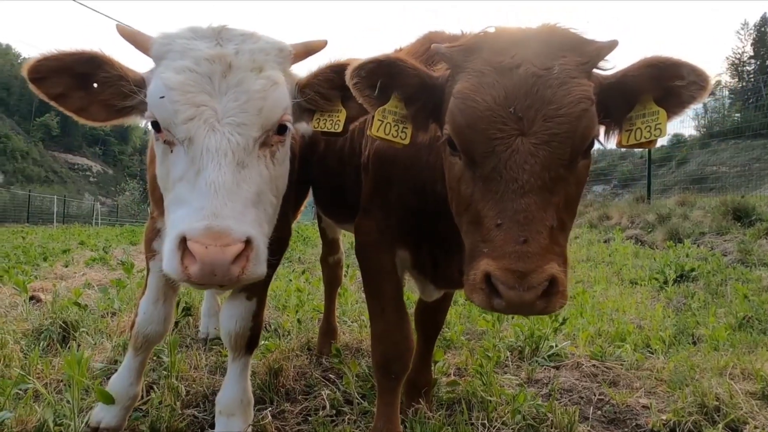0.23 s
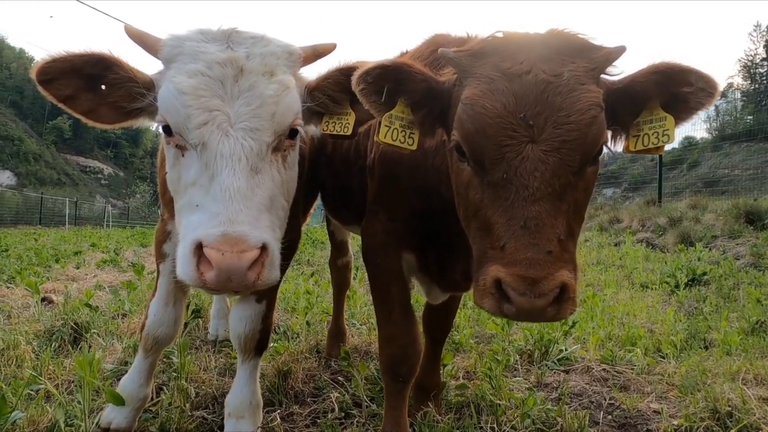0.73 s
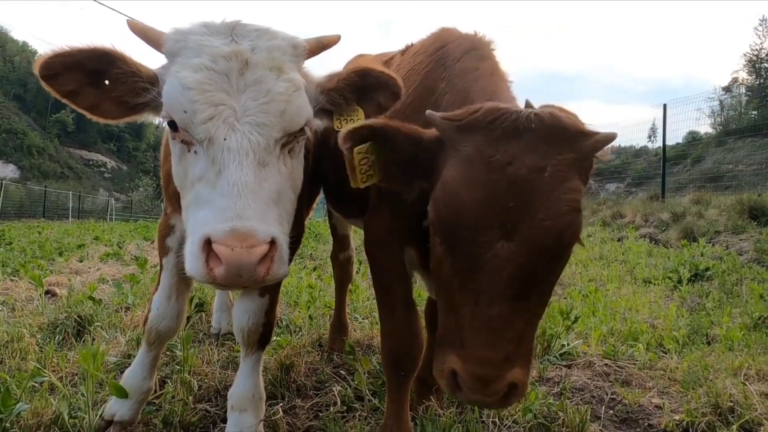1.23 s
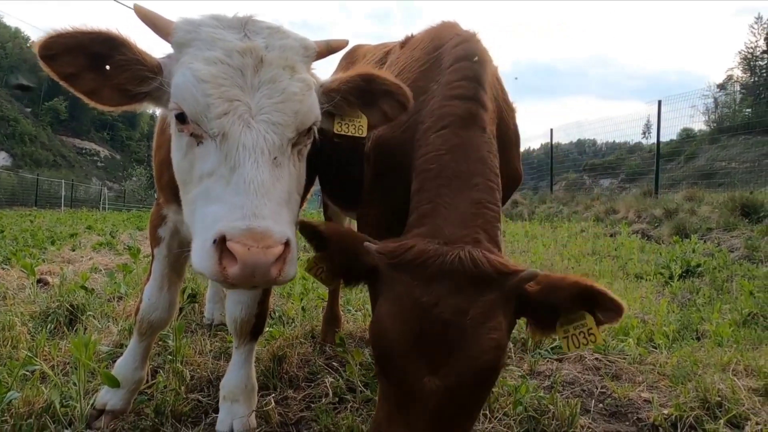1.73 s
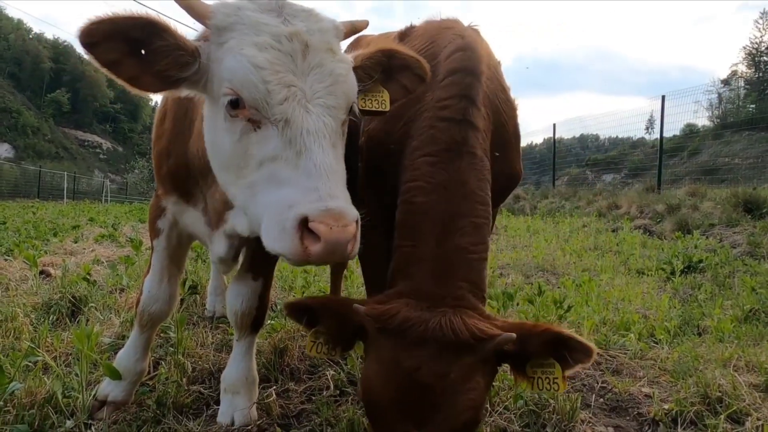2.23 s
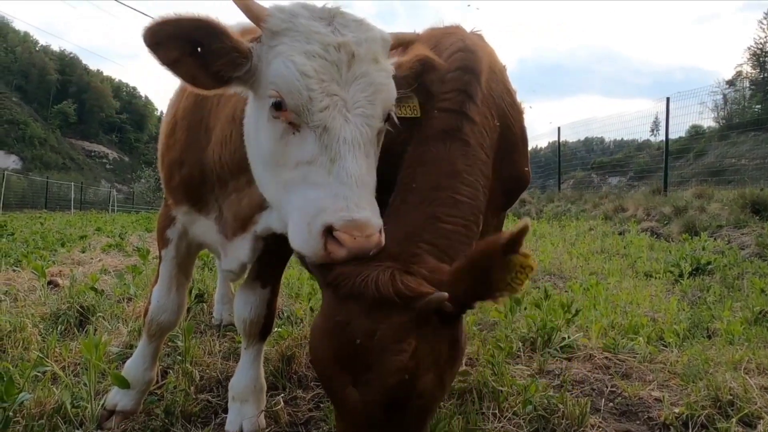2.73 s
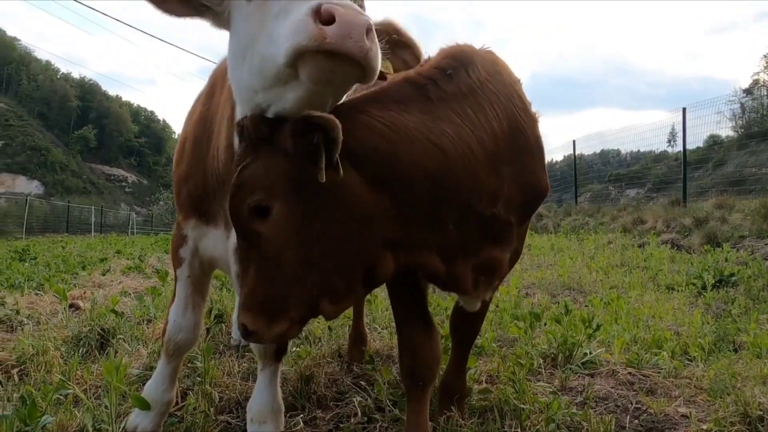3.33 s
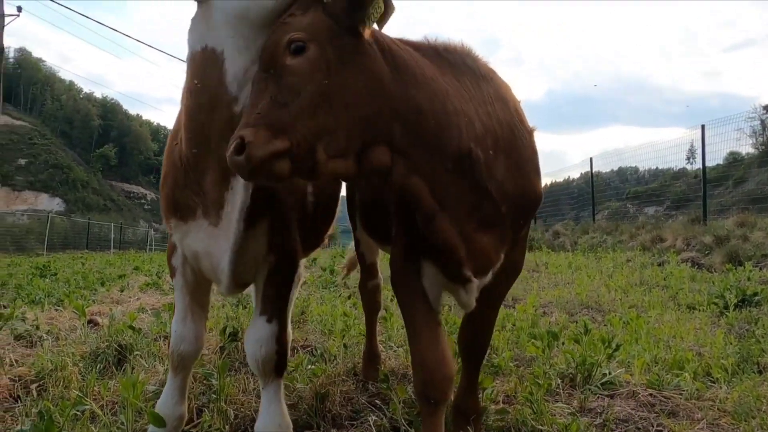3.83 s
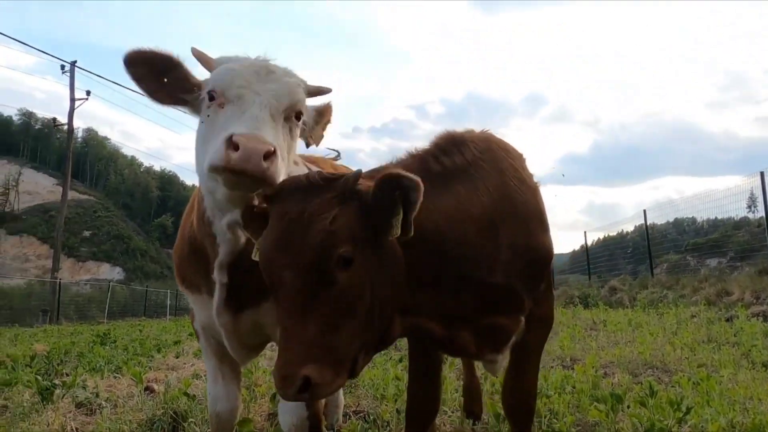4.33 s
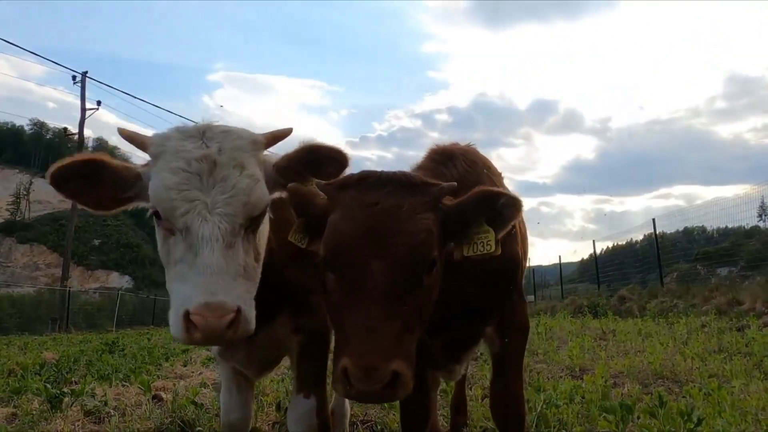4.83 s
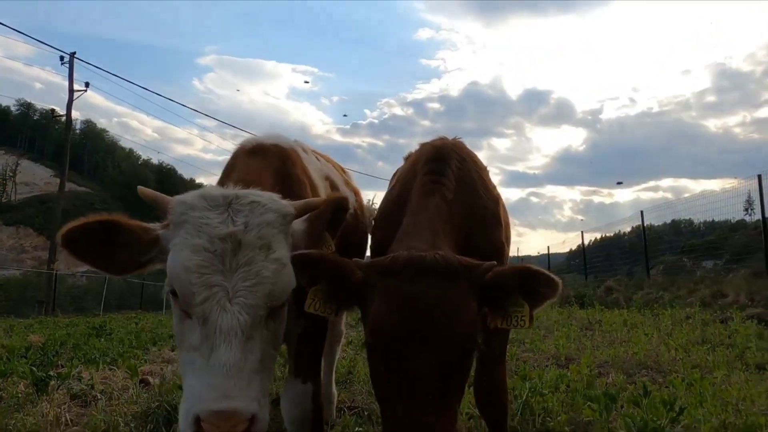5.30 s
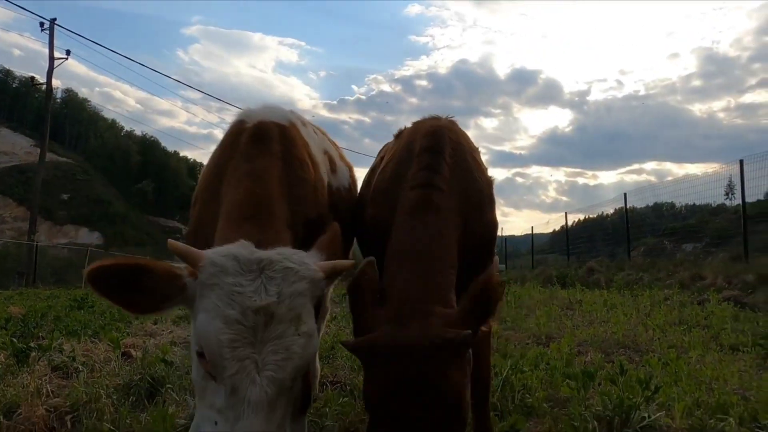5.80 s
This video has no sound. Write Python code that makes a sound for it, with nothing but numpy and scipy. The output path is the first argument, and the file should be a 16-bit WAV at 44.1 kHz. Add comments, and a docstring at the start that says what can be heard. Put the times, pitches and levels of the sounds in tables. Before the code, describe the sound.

Two young cattle call close by in a pasture: a hoarse growling moo, snorts, then a hummed moo rising and cracking into a rasping bellow.

```python
"""Calls of cattle, two of them, close by in a pasture: trains of fold pulses filtered by nose, throat and mouth.
The first is a hoarse growl with a climbing tone that locks into a pitch and breaks off; snorts and rustling follow.
After a silence the second starts as a closed-mouth hum, opens into a bright rising moo and cracks into
a rasping bellow. Snorts, hiss, rustling and open air are shaped noise."""
import sys
import numpy as np
from scipy import signal
from scipy.fft import rfft, irfft
from scipy.io import wavfile
from scipy.ndimage import uniform_filter1d, map_coordinates

SR = 44100
rng = np.random.default_rng(int(sys.argv[2]) if len(sys.argv) > 2 else 0)


def materialize(psi):
    """Save the field psi as 16-bit PCM at rate SR to the path in sys.argv[1].

    A 1-D psi becomes a single channel; in a 2-D psi each row is a channel.
    """
    bounded = np.clip(np.atleast_2d(psi).T, -1, 1)
    quanta = np.round(bounded * 32767).astype(np.int16)
    wavfile.write(sys.argv[1], SR, quanta)


N = 267246
TIME = np.arange(N) / SR
SPLIT_HZ, CUTOFF_HZ = 700, 15900   # chest / bright split; top of the recorded band

# Notes that scoop up to pitch and droop as breath runs out. Columns: start in seconds, end in seconds,
# top pitch in Hz, scoop in Hz, scoop time in seconds, droop in Hz, droop time in seconds.
GROWL_NOTE = (.53, 1.46, 310, 150, .3, 160, .045)
LOCKED_NOTE = (.93, 1.45, 101.5, 10.2, .2, 11, .095)
HUM_NOTE = (2.6, 3.61, 106.8, 19, .23, 7.5, .11)
LIFT_NOTE = (3.67, 3.866, 129, 34, .05, 0, .05)
MOO_NOTE = (3.862, 5.0, 150.3, 20.4, .57, 31, .048)
BELLOW_NOTE = (4.78, 5.795, 308, 70, .19, 60, .014)

# Voice levels below (chest) and above (bright) the split. Columns: full from in seconds, until in seconds,
# level in dB, swell in dB per second, attack in seconds, release in seconds.
CLIMB_CHEST = (0, .93, -60, 46, .05, .025)
LOCKED_CHEST = (.95, 1.415, -16.5, -1.5, .04, .02)
LOCKED_BRIGHT = (.98, 1.34, -30.5, 5, .07, .035)
SQUEAK_CHEST = (3.72, 3.76, -39.5, 0, .21, .025)
SQUEAK_BRIGHT = (3.6, 3.84, -49.5, 16, .16, .02)
BELLOW_CHEST = (4.92, 5.805, -25.5, 0, .2, .03)
BELLOW_BRIGHT = (4.95, 5.82, -29, -4, .15, .03)

# Short swells and dips in the level of the voice, some like the beating of close partials.
# Each row: time in seconds, half length in seconds, level change in dB.
BUMPS = [(.812, .022, 6), (.98, .03, 5), (1.04, .035, 4), (1.09, .018, 4.5), (1.135, .012, -5),
         (1.175, .025, 3), (1.203, .008, -8), (1.22, .012, 2), (1.24, .01, -6), (1.29, .04, -2),
         (1.385, .03, 7), (5.02, .08, 3), (5.762, .012, -6), (5.785, .01, 8)]

# A closed-mouth note is louder the higher it gets. Columns: chest level at the top pitch in dB,
# chest slope in dB per Hz, bright level at the top pitch in dB, bright slope in dB per Hz.
HUM_EFFORT = (-35, 1.3, -47, .45)
LIFT_EFFORT = (-41, .35, -44.5, .4)

# Fold vibrations: slackening at the end of each call, closed-mouth grumble, undertone of the moo, and the
# clearer tone in the bellow. Each row: time in seconds, pulse rate in Hz, chest level in dB, bright level in dB.
SLACKEN = [(1.39, 205, -37, -56), (1.42, 180, -21.5, -39.5), (1.46, 145, -33, -44), (1.51, 160, -33, -55),
           (1.57, 150, -51, -75)]
LAST_SLACKEN = [(5.77, 130, -50, -70), (5.79, 150, -40, -55), (5.82, 85, -43, -56), (5.87, 68, -44, -59),
                (5.94, 70, -66, -78)]
GRUMBLE = [(0, 149, -39.5, -52), (0.121, 151, -40, -53.5), (0.269, 168, -33.5, -45),
           (0.399, 159, -36.5, -42), (.5, 165, -32, -44), (0.559, 176, -33, -49)]
UNDERTONE = [(3.949, 61.8, -66, -70), (4.148, 76.1, -44, -56), (4.401, 92.4, -44, -57),
             (4.64, 111.6, -41.5, -54), (4.679, 114.8, -27.5, -34), (4.801, 118.5, -29, -34),
             (4.918, 133.4, -36, -31.5), (5.031, 94.1, -34, -39), (5.08, 84.6, -50, -65)]
BELLOW_TONE = [(4.82, 285, -45, -65), (4.9, 293, -24, -45), (5.02, 287, -24, -42), (5.08, 295, -25, -44),
               (5.11, 325, -35, -52), (5.15, 338, -28, -48), (5.26, 338, -30, -50), (5.29, 403, -34, -42),
               (5.34, 408, -33, -36), (5.37, 338, -29, -48), (5.65, 338, -28.5, -48), (5.74, 338, -29, -50),
               (5.78, 320, -45, -65)]

# Effort and mouth opening: the growl gives way while the folds hold a pitch, returns as they lose it.
# Each row: time in seconds, chest level in dB, bright level in dB.
GROWL_LEVELS = [(.495, -42, -47), (.54, -25.5, -32), (.77, -22.5, -30), (.82, -25, -27.5),
                (.94, -26.5, -27.5), (1.0, -31, -33.5), (1.3, -31.5, -33.5), (1.36, -29, -30),
                (1.42, -27, -30), (1.47, -38, -41), (1.58, -52, -60)]
MOO_LEVELS = [(3.862, -37, -29), (3.884, -37, -26), (3.938, -25, -24), (4.152, -18, -29), (4.342, -19, -22),
              (4.64, -24, -26), (4.846, -25, -25), (4.932, -19, -24), (5.0, -25, -27)]

# Overall spectral slopes of voices and noises. Each row: frequency in Hz, relative level in dB.
CLIMB_SLOPE = [(45, -27), (75, -13.5), (110, 3), (140, -9.5), (170, 1), (200, -14), (240, 3), (272, 5.5),
               (335, -9), (460, -3), (600, -14), (1050, -8), (1350, -9.5), (1750, -21), (3000, -31),
               (5000, -46), (15000, -64.5)]
LOCKED_SLOPE = [(90, -58), (200, -29), (290, 4), (390, -17), (490, -14), (590, -7), (700, -24), (860, -20),
                (1080, -20), (1290, -14.5), (1550, -22), (1900, -21), (2200, -33), (2800, -29), (3700, -46),
                (4500, -40), (5500, -56.5), (15000, -63.5)]
SLACKEN_SLOPE = [(80, -26), (150, 0), (190, -4), (290, 1.5), (450, -24), (1400, -7), (5000, -46),
                 (15000, -65)]
GRUMBLE_SLOPE = [(29, -40), (50, 1), (96, 8), (175, -1), (238, -16.5), (306, -3.5), (458, -5.5), (649, -22),
                 (742, -10), (935, -17), (1700, -16), (2400, -22.5), (2800, -27), (5000, -52), (6500, -73),
                 (11000, -120)]
GROWL_SLOPE = [(40, -26), (110, -16), (170, 0.5), (270, 2.5), (480, -0.5), (750, -10), (1300, -8),
               (1900, -18), (2170, -27), (2450, -20.5), (2900, -20.5), (3800, -43), (4500, -27),
               (5500, -47), (15000, -62)]
HUM_SLOPE = [(50, -6), (95, 5), (210, 4.5), (310, -16.5), (530, -13), (740, -25), (1200, -22.5),
             (1600, -30.5), (1950, -35), (2250, -30.5), (2900, -31.5), (3500, -38.5), (5300, -55),
             (11000, -52.5), (15000, -59)]
SQUEAK_SLOPE = [(100, -13), (190, 6), (380, 8), (600, -8), (850, -4), (1250, -5), (1700, -17.5),
                (2450, -6.5), (3500, -12.5), (4300, -34), (10000, -35.5), (15000, -34)]
MOO_SLOPE = [(125, -27.5), (280, -14.5), (390, -0.5), (445, 0), (560, -31.5), (700, -17.5), (860, -12),
             (1020, -23), (1300, -15.5), (2000, -22.5), (3300, -28.5), (4000, -40.5), (5300, -49.5),
             (9500, -50), (15000, -55)]
UNDERTONE_SLOPE = [(30, -26), (65, -8), (110, -9), (160, -8), (235, 0), (340, -17.5), (600, -11),
                   (1300, -15), (1900, -26), (3000, -29), (5000, -46), (15000, -74)]
BELLOW_SLOPE = [(50, -34.5), (130, -26), (240, 2.5), (330, -1), (460, -5), (800, -10), (1300, -7),
                (1650, -17.5), (2600, -23.5), (3700, -37.5), (4400, -34), (5500, -42.5), (11000, -44.5),
                (15000, -50)]
SNORT_SLOPE = [(180, -34), (300, -10), (442, 6), (630, -6), (1040, 3), (1150, -3.5), (1860, -6),
               (2220, -16), (5000, -48), (6500, -45), (11000, -120)]
HISS_SLOPE = [(2000, -8), (3200, 3), (5000, -1), (7000, -1), (9000, 3), (11500, 1), (15000, -7.5)]
AIR_SLOPE = [(10, -22), (25, -8), (45, -5.5), (100, -6), (250, -12), (1000, -22.5), (4000, -31),
             (15000, -52)]

# Fixed-shape resonances of nose, mouth and throat. Each row: frequency in Hz, width in Hz, lift in dB.
NOSE = [(425, 100, 8.5), (540, 70, -4), (630, 90, 12), (1080, 90, -8), (1200, 110, 7), (2370, 160, 7),
        (2810, 230, 15), (3840, 86, 7), (4570, 180, 12), (6460, 660, 20), (9120, 180, 16)]
NOSTRILS = [(2460, 230, -20), (2840, 190, 19)]
MOUTH = [(1410, 146, 2.75), (1726.5, 131, 16), (2015, 110, -10), (2180, 120, 4), (2565, 110, 10),
         (2790, 110, -13), (3020, 170, 3.5), (3350, 500, 3), (4080, 250, -7), (4420, 500, 12),
         (5130, 160, -8), (5800, 140, 8), (6950, 400, -9), (7880, 290, 6.5), (8300, 150, -8),
         (8950, 500, 11)]
THROAT = [(275, 70, 2), (920, 64.6, 5.5), (1940, 150, 6.5), (2480, 120, 5)]

# Lips pushing forward shift the resonances of the second call, mostly down.
# Each row: time in seconds, factor on resonance frequency (a ratio).
NOSE_GLIDE = [(2.6, 1.025), (3.0, .995), (3.3, 0.975), (3.5, 0.945), (3.85, 0.84)]
MOUTH_GLIDE = [(3.86, 1.035), (4.05, 0.99), (4.2, .99), (4.45, 0.99), (4.8, 0.962), (5.0, 0.99)]

# Momentary resonances as jaw, tongue and lips move. Each row: time in seconds, half length in seconds,
# frequency in Hz, glide in Hz per second, width in Hz, lift in dB.
GROWL_SHAPES = [(.57, .06, 160, 0, 30, 7), (.58, .06, 3400, 0, 200, 8), (.63, .05, 1510, 0, 80, 8),
                (.64, .05, 470, 0, 50, 6), (.68, .13, 1300, 0, 400, 3), (.84, .06, 450, 0, 110, 7),
                (.85, .06, 2050, 0, 200, 5), (.86, .09, 2650, 0, 500, 4), (.87, .08, 4450, 0, 400, 6),
                (.88, .06, 1140, -800, 110, 6), (.94, .04, 950, 0, 70, 8), (1.37, .04, 930, -5000, 200, 7)]
LOCKED_SHAPES = [(1.03, .07, 950, 0, 70, 8), (1.072, .018, 570, 0, 120, -14), (1.2, .12, 390, 0, 50, 7),
                 (1.2, .1, 1660, 0, 70, 7), (1.2, .12, 1170, 0, 60, 4), (1.27, .06, 585, 0, 70, 4),
                 (1.365, .018, 570, 0, 120, -12), (1.42, .02, 570, 0, 120, -9)]
HUM_SHAPES = [(2.68, .12, 480, 0, 250, 6), (2.68, .12, 2450, 0, 140, -9), (2.92, .06, 2300, -400, 110, 10),
              (3.0, .1, 2590, 0, 90, 8), (3.0, .13, 935, 0, 70, 6), (3.0, .06, 1240, 0, 70, 4),
              (3.27, .2, 520, 0, 50, -10), (3.27, .11, 2315, 200, 90, 8), (3.33, .11, 3790, -300, 100, 9),
              (3.4, .15, 1780, 0, 80, 7), (3.55, .08, 1260, 200, 110, 7)]
MOO_SHAPES = [(3.87, .05, 900, 0, 500, -8), (3.95, .07, 1190, 0, 100, -6), (4.0, .07, 1400, 0, 160, 4),
              (4.0, .06, 2570, 0, 100, 4), (4.02, .07, 2950, 0, 120, 6), (4.13, .035, 1720, 0, 300, -10),
              (4.14, .06, 3300, 0, 700, -5), (4.27, .05, 2360, 0, 200, 6), (4.35, .11, 1845, 100, 60, 9),
              (4.4, .06, 2140, 200, 80, 6), (4.43, .05, 2320, 0, 160, -9), (4.47, .08, 3180, 300, 400, 7),
              (4.58, .1, 4280, 0, 250, 5), (4.65, .12, 1930, 0, 160, -7), (4.76, .13, 2920, 200, 70, 6),
              (4.76, .13, 3660, 0, 200, 8), (4.78, .1, 1610, 0, 90, 7), (4.79, .1, 2490, 0, 80, 5)]
BELLOW_SHAPES = [(4.98, .06, 1750, 0, 300, 7), (5.0, .028, 3800, 0, 1400, 16), (5.07, .05, 590, 0, 90, 5),
                 (5.3, .05, 310, 0, 90, -4), (5.31, .03, 600, 0, 200, -7)]

# Stereo balance. Each row: frequency in Hz, left minus right level in dB.
GROWL_BALANCE = [(60, -5.5), (110, -2), (200, 8), (380, 3), (700, 1.5), (1290, -0.5), (2380, -0.5),
                 (4400, 2), (8120, 0.5), (15000, -2.5)]
LOCKED_BALANCE = [(60, 3.5), (110, 4.0), (200, -2), (380, -4), (700, -3), (1290, 0), (2380, 1.5),
                  (4400, -1.5), (8120, -1), (15000, -1.5)]
HUM_BALANCE = [(60, 10), (110, 9), (200, 11.5), (380, 7), (700, 6.5), (1290, 3.5), (2380, 8), (4400, 5.5),
               (8120, 4), (15000, -2)]
MOO_BALANCE = [(60, -17), (110, -6.5), (200, 6), (380, 6), (700, 1), (1290, 7), (2380, 5), (4400, 8),
               (8120, 5), (15000, -2)]
BELLOW_BALANCE = [(60, 0.5), (110, 2.7), (200, 8.7), (380, 2.6), (700, 0.51), (1290, 1.5), (2380, 0.87),
                  (4400, 1.5), (8120, 1.0), (15000, 1.5)]

# Stereo phase. Each row: frequency in Hz, lead of the left side in radians.
LOCKED_LEAD = [(290, 1.0), (500, 0.94), (800, 0.095), (1400, -0.49), (5000, 0)]
HUM_LEAD = [(110, 0.19), (210, -0.21), (420, 0), (1100, 0.6), (3000, 0)]
MOO_LEAD = [(280, 0.24), (430, 0.38), (850, 0.41), (1700, 0.25), (2400, 1), (5000, 0)]

# Flat curve: no slope, balance or lead. Each row: frequency in Hz, value in dB or radians.
FLAT = [(50, 0), (15000, 0)]

# Breath and wind noises. Each row: full from in seconds, until in seconds, level in dB,
# swell in dB per second, attack in seconds, release in seconds.
NOSE_LEAK = [(2.85, 3.08, -64, 4, .25, .08)]
SNORTS = [(1.64, 1.68, -45, -20, .13, .08), (2.0, 2.09, -54.5, -10, .07, .04)]
CALL_HISS = [(0, 1.42, -57, 5.3, .05, .025)]
GUSTS = [(0, 2.1, -46, -5, .05, .1), (3.7, 5.6, -53, -4, .17, .1), (5.84, 5.88, -53, 0, .05, .06)]

# Hooves and muzzles brush the grass. Each row: time in seconds, level in dB, attack in seconds, release in seconds.
RUSTLES = [(.18, -52, .1, .04), (.328, -46.5, .012, .012), (.36, -50, .012, .015), (.84, -48.5, .04, .03),
           (1.8, -48.5, .035, .018), (2.04, -60, .13, .1)]

# First call's tone: steady climb, sharper with each swell; brightness over chest jumps as the mouth opens.
CLIMB_FROM_HZ, CLIMB_HZ_PER_S, CLIMB_TOP_HZ, CLIMB_HZ_PER_DB = 72, 72, 135, .6
MOUTH_OPENS_S, MOUTH_OPENING_S, CLOSED_BRIGHT_DB, OPEN_BRIGHT_DB = .51, .04, -14, -10
# Growl rattle, before levelling.
RATTLE_POINTS_PER_S, RATTLE_DB = 70, 2.5
# Squeak: slides up as the lips part, then levels off.
SQUEAK_START_S, SQUEAK_FROM_HZ, SQUEAK_HZ_PER_S, SQUEAK_TOP_HZ = 3.49, 118, 360, 196
# Moo: folds snap shut harder as it rises, lifting its top end; it then melts into the bellow.
SNAP_ABOVE_HZ, SNAP_DB, SNAP_DB_PER_HZ = 5000, 5, .5
MOO_BREAK_S = .035
# Bellow: overblown folds flap unevenly; part of each swell or dip reaches the bright formants.
FLAP_HZ, FLAP_SPREAD, FLAP_DEPTH = 56, .3, .12
BELLOW_BUMP_SHARE = .25
GRASS_DB, AIR_DB = -68, -74   # floors between rustles and gusts
# Silence between the calls; 20 dB down after FADE_S.
FADE_FROM_S, FADE_S, RESUME_S = 2.11, .075, 2.598


def first_call():
    """A tone climbs, the folds lock to a lower pitch, then slacken."""
    bump_db = level_bumps()
    slack = folds(in_time(SLACKEN)[0], wobble=.02, jitter_ms=.2, shimmer_db=1.5, air=.25)
    slack = tract(slack, SLACKEN_SLOPE)
    return climbing_tone(bump_db) + locked_tone(bump_db) + voiced_along(slack, SLACKEN)


def climbing_tone(bump_db):
    """Fold pulses, every other one weaker, rise in pitch with time and follow each swell or dip."""
    pitch = np.minimum(CLIMB_FROM_HZ + CLIMB_HZ_PER_S * TIME, CLIMB_TOP_HZ) + CLIMB_HZ_PER_DB * bump_db
    chest_db = held(*CLIMB_CHEST) + bump_db
    opening_s = [MOUTH_OPENS_S, MOUTH_OPENS_S + MOUTH_OPENING_S]
    mouth_db = np.interp(TIME, opening_s, [CLOSED_BRIGHT_DB, OPEN_BRIGHT_DB])
    climb = folds(pitch, wobble=.007, jitter_ms=.08, shimmer_db=.9, air=.12, limp_db=4)
    climb = tract(climb, CLIMB_SLOPE, balance=GROWL_BALANCE)
    climb = scatter(climb, wet_db=-1, t60=.08, above_hz=800)
    return voiced(climb, chest_db, chest_db + mouth_db)


def locked_tone(bump_db):
    """Folds vibrate regularly at one held pitch; swells and dips touch the chest band only."""
    locked = folds(note_pitch(LOCKED_NOTE), wobble=.003, jitter_ms=.035, shimmer_db=.7, air=.1)
    locked = tract(locked, LOCKED_SLOPE, (), LOCKED_BALANCE, LOCKED_LEAD)
    locked = scatter(reshaped(locked, LOCKED_SHAPES), wet_db=0, t60=.08, above_hz=1700)
    return voiced(locked, held(*LOCKED_CHEST) + bump_db, held(*LOCKED_BRIGHT))


def growl():
    """Loose folds rattle without a steady pitch, first through the nose, then through the open mouth."""
    closed = folds(in_time(GRUMBLE)[0], wobble=.15, jitter_ms=.717, shimmer_db=2.0, air=.2, wobble_rate=110)
    closed = scatter(tract(closed, GRUMBLE_SLOPE, NOSTRILS), wet_db=2.5, t60=.079)
    opened = folds(note_pitch(GROWL_NOTE), wobble=.13, jitter_ms=.5, shimmer_db=2.0, air=.45, wobble_rate=120)
    opened = opened * from_db(RATTLE_DB * drift(RATTLE_POINTS_PER_S))
    opened = tract(opened, GROWL_SLOPE, balance=GROWL_BALANCE)
    opened = scatter(opened, wet_db=4.5, t60=.1, above_hz=560)
    return voiced_along(closed, GRUMBLE) + voiced_along(reshaped(opened, GROWL_SHAPES), GROWL_LEVELS)


def hum():
    """Steady pulses and leaking air sound through the nose, sag, then lift towards the moo."""
    lifting = TIME > LIFT_NOTE[0]
    pitch = np.where(lifting, note_pitch(LIFT_NOTE), note_pitch(HUM_NOTE))
    levels_db = np.where(lifting, effort(LIFT_NOTE, LIFT_EFFORT), effort(HUM_NOTE, HUM_EFFORT))
    levels_db = uniform_filter1d(levels_db, size=1024)
    nasal = folds(pitch, wobble=.001, jitter_ms=.007, shimmer_db=.3, air=.045)
    nasal = tract(gliding(nasal, NOSE, NOSE_GLIDE), HUM_SLOPE, (), HUM_BALANCE, HUM_LEAD)
    nasal = scatter(reshaped(nasal, HUM_SHAPES), wet_db=1, t60=.068, above_hz=700)
    pulsing = 1 + .6 * np.cos(2 * np.pi * np.cumsum(pitch) / SR)
    leak = rush(NOSE_LEAK, SNORT_SLOPE, width=.4) * pulsing
    return (voiced(nasal, *levels_db) + leak) * during(HUM_NOTE[0], LIFT_NOTE[1])


def lip_squeak():
    """Parting lips vibrate in pulses that slide up to a steady pitch."""
    slide = SQUEAK_FROM_HZ + SQUEAK_HZ_PER_S * (TIME - SQUEAK_START_S)
    slide = np.clip(slide, SQUEAK_FROM_HZ, SQUEAK_TOP_HZ)
    lips = folds(slide, wobble=.008, jitter_ms=.06, shimmer_db=1.0, air=.18)
    lips = scatter(tract(lips, SQUEAK_SLOPE, balance=MOO_BALANCE), wet_db=4, t60=.09, above_hz=600)
    return voiced(lips, held(*SQUEAK_CHEST), held(*SQUEAK_BRIGHT))


def moo():
    """The open mouth makes the pulses bright and brassy; a lower vibration grows beneath."""
    pitch = note_pitch(MOO_NOTE)
    clear = folds(pitch, wobble=.001, jitter_ms=.009, shimmer_db=.4, air=.07)
    top = signal.sosfiltfilt(signal.butter(4, SNAP_ABOVE_HZ, "high", fs=SR, output="sos"), clear)
    snap_db = SNAP_DB - SNAP_DB_PER_HZ * (MOO_NOTE[2] - pitch)
    clear = clear + top * (from_db(snap_db) - 1)
    clear = tract(gliding(clear, MOUTH, MOUTH_GLIDE), MOO_SLOPE, (), MOO_BALANCE, MOO_LEAD)
    clear = scatter(reshaped(clear, MOO_SHAPES), wet_db=1, t60=.09, above_hz=3000)
    under = folds(in_time(UNDERTONE)[0], wobble=.012, jitter_ms=.15, shimmer_db=1.2, air=.2)
    under = tract(under, UNDERTONE_SLOPE, balance=BELLOW_BALANCE)
    under = scatter(under, wet_db=-16, t60=.3, above_hz=920)
    breaking = np.clip((MOO_NOTE[1] - TIME) / MOO_BREAK_S, 0, 1)
    return breaking * voiced_along(clear, MOO_LEVELS) + voiced_along(under, UNDERTONE)


def bellow():
    """Overblown folds rasp at about twice the moo's pitch around a clearer tone, then slacken."""
    tone = folds(in_time(BELLOW_TONE)[0], wobble=.008, jitter_ms=.06, shimmer_db=.8, air=.1)
    tone = tract(tone, LOCKED_SLOPE, balance=BELLOW_BALANCE)
    slack = folds(in_time(LAST_SLACKEN)[0], wobble=.02, jitter_ms=.2, shimmer_db=1.5, air=.25)
    slack = tract(slack, GRUMBLE_SLOPE)
    return bellow_rasp() + voiced_along(tone, BELLOW_TONE) + voiced_along(slack, LAST_SLACKEN)


def bellow_rasp():
    """Unsteady pulses, chopped into uneven bursts by the flapping folds."""
    bump_db = level_bumps()
    rasp = folds(note_pitch(BELLOW_NOTE), wobble=.07, jitter_ms=.12, shimmer_db=1.0, air=.35, wobble_rate=170)
    flaps = np.cumsum(FLAP_HZ * (1 + FLAP_SPREAD * drift(40))) / SR
    rasp = rasp * (1 + FLAP_DEPTH * np.cos(2 * np.pi * flaps)) * from_db(2.2 * drift(110))
    rasp = tract(rasp, BELLOW_SLOPE, THROAT, BELLOW_BALANCE)
    rasp = scatter(rasp, wet_db=2, t60=.17, above_hz=545)
    bright_db = held(*BELLOW_BRIGHT) + BELLOW_BUMP_SHARE * bump_db
    return voiced(reshaped(rasp, BELLOW_SHAPES), held(*BELLOW_CHEST) + bump_db, bright_db)


def folds(pitch, wobble, jitter_ms, shimmer_db, air, wobble_rate=60, limp_db=0, order=8):
    """One sharp pulse per closure, uneven in time and strength (every other one limp_db weaker), plus air puffs."""
    cycles = np.cumsum(pitch * (1 + wobble * drift(wobble_rate))) / SR
    at = np.interp(np.arange(1, cycles[-1]), cycles, np.arange(N))
    chance = rng.standard_normal((4096, 2))[:len(at)]
    at = at + chance[:, 0] * jitter_ms * SR / 1000
    strength_db = shimmer_db * np.clip(chance[:, 1], -2, 2) - limp_db * (np.arange(len(at)) % 2)
    # windowed sinc places each pulse between samples
    taps = at.astype(int)[:, None] + np.arange(-order, order + 1)
    offset = taps - at[:, None]
    shape = np.sinc(offset) * np.sinc(offset / (order + 1)) * from_db(strength_db)[:, None]
    pulses = np.bincount(np.clip(taps, 0, N - 1).ravel(), shape.ravel(), N)
    # all-pass: smears each pulse over a few ms, so the voice is less spiky
    loop = np.r_[1, np.zeros(SR // 600), -.55]
    pulses = signal.lfilter(loop[::-1], loop, pulses + 1e-18)
    puffs = rng.standard_normal((2, N)) * (1 + np.cos(2 * np.pi * cycles))
    return rms_one(pulses - pulses.mean()) + air * rms_one(puffs)


def note_pitch(note):
    """Pitch settles towards its top as pressure builds, and falls away at the end."""
    start, end, top_hz, scoop_hz, scoop_s, droop_hz, droop_s = note
    t = np.clip(TIME, start, end)
    return top_hz - scoop_hz * np.exp((start - t) / scoop_s) - droop_hz * np.exp((t - end) / droop_s)


def level_bumps():
    """Level change in dB, one smooth bell for each short swell or dip."""
    return sum(db * np.exp(-((TIME - s) / length_s) ** 2) for s, length_s, db in BUMPS)


def effort(note, law):
    """Chest and bright levels in dB that follow the pitch of a note."""
    chest_db, chest_db_per_hz, bright_db, bright_db_per_hz = law
    flat_hz = note[2] - note_pitch(note)
    return np.array([chest_db - chest_db_per_hz * flat_hz, bright_db - bright_db_per_hz * flat_hz])


def tract(x, slope, resonances=(), balance=FLAT, lead=FLAT, size=8192):
    """Minimum-phase filter of slope and resonances, with level and phase differences between the ears."""
    hz = np.arange(size // 2 + 1) * SR / size
    ears = np.array([[.5], [-.5]])
    margin = size // 32
    peaks_db = sum(lift / (1 + (2 * (hz - f) / width) ** 2) for f, width, lift in resonances)
    db = at_hz(slope, hz) + peaks_db
    # folding the cepstrum makes the phase minimum
    cepstrum = irfft(np.log(from_db(db + at_hz(balance, hz) * ears)))
    cepstrum[:, 1:size // 2] *= 2
    cepstrum[:, size // 2 + 1:] = 0
    response = irfft(np.exp(rfft(cepstrum) + 1j * at_hz(lead, hz) * ears))
    response = np.roll(response, margin, axis=1)
    return signal.oaconvolve(np.atleast_2d(x), response, axes=1)[:, margin:margin + N]


def gliding(x, resonances, glide):
    """Resonances that move together: they ring on a clock that runs at the pace of the glide."""
    pace = in_time(glide)[0]
    clock = np.cumsum(pace) - np.sum(pace[:N // 2]) + N // 2

    def read(sound, at):
        """Sound read at fractional sample positions."""
        return np.array([map_coordinates(side, [at], order=3) for side in sound])

    warped = read(x, np.interp(np.arange(N), clock, np.arange(N)))
    return read(tract(warped, FLAT, resonances), clock)


def reshaped(x, shapes):
    """Each passing shape of the mouth lifts or damps one gliding resonance."""
    out = x.copy()
    for s, half_s, hz, hz_per_s, width_hz, lift_db in shapes:
        near = np.abs(TIME - s) < 3 * half_s
        t = TIME[near] - s
        # shift the resonance to 0 Hz, low-pass, shift back
        turn = np.exp(2j * np.pi * (hz + .5 * hz_per_s * t) * t)
        r = np.exp(-np.pi * width_hz / SR)
        band = 2 * np.real(turn * signal.lfilter([1 - r], [1, -r], out[:, near] / turn))
        out[:, near] += band * (from_db(lift_db * np.exp(-(t / half_s) ** 2)) - 1)
    return out


def voiced(sound, chest_db, bright_db, even_s=.046):
    """Effort sets the level of the chesty lows, mouth opening that of the bright formants."""
    low = signal.sosfiltfilt(signal.butter(4, SPLIT_HZ, fs=SR, output="sos"), sound)
    size = int(even_s * SR)
    out = 0
    for band, db in ((low, chest_db), (sound - low, bright_db)):
        power = uniform_filter1d(uniform_filter1d(band.mean(0) ** 2, size), size)
        out = out + band * from_db(db) / np.sqrt(np.abs(power) + 1e-12)
    return out


def voiced_along(sound, rows):
    """A voice that follows the last two columns of a curve as levels and lasts as long as it."""
    *_, chest_db, bright_db = in_time(rows)
    return voiced(sound, chest_db, bright_db) * during(rows[0][0], rows[-1][0])


def scatter(x, wet_db, t60, above_hz=100):
    """Grass and bodies nearby return a short diffuse echo of the shorter waves, different at each ear."""
    t = TIME[:SR // 2]
    echo = rng.standard_normal((2, len(t))) * from_db(-60 * t / t60) * (t > .003)
    echo /= np.sqrt(np.sum(echo ** 2, axis=1, keepdims=True))
    echo = signal.sosfilt(signal.butter(2, above_hz, "high", fs=SR, output="sos"), echo)
    return x + from_db(wet_db) * signal.oaconvolve(x, echo, axes=1)[:, :N]


def held(start, end, db, swell_db_per_s, attack_s, release_s):
    """Level in dB: 20 dB down attack_s before start, a swelling or sagging hold, a release with a long tail."""
    early = np.maximum(start - TIME, 0) / attack_s
    late = np.maximum(TIME - end, 0) / release_s
    level = db + swell_db_per_s * (np.clip(TIME, start, end) - start)
    return level - 20 * np.minimum(early ** 2, 10) - 20 * np.log10(1 + late ** 2)


def during(start, end, fade_s=.006):
    """One from start to end, fading to silence outside."""
    return np.clip(1 + np.minimum(TIME - start, end - TIME) / fade_s, 0, 1)


def in_time(rows):
    """Each column of a curve table at every sample."""
    s, *columns = np.transpose(rows)
    return [np.interp(TIME, s, c) for c in columns]


def at_hz(points, hz):
    """A spectrum table read on a log-frequency axis."""
    f, value = np.transpose(points)
    return np.interp(np.log(hz + 1e-9), np.log(f), value)


def drift(rate):
    """Smooth curve through `rate` random points a second; spread 1."""
    knots = rng.standard_normal(int(N / SR * rate) + 4)
    coarse = map_coordinates(knots, [TIME[::16] * rate], order=3, mode="nearest")
    return np.interp(TIME, TIME[::16], rms_one(coarse))


def from_db(db):
    """Amplitude factor of a level in dB."""
    return 10 ** (np.asarray(db) / 20)


def rms_one(x):
    """Signal scaled to an RMS of one."""
    return x / np.sqrt(np.mean(x ** 2) + 1e-20)


def rush(puffs, slope, width, floor=0):
    """Puffs of turbulent air over a floor, partly different at the two ears."""
    side = rng.standard_normal(N) * np.array([[1], [-1]])
    sound = tract(rng.standard_normal(N) + width * side, slope)
    power = floor ** 2 + sum(from_db(held(*puff)) ** 2 for puff in puffs)
    return sound / np.std(sound.mean(0)) * np.sqrt(power)


def pasture():
    """Hiss and rustling grass around the first call, two snorts after it, and the rumble of open air."""
    brushes = [(s, s, db, 0, attack_s, release_s) for s, db, attack_s, release_s in RUSTLES]
    grass = from_db(GRASS_DB) * (TIME < RESUME_S - FADE_S)
    hiss = rush(CALL_HISS + brushes, HISS_SLOPE, width=.85, floor=grass)
    snorts = rush(SNORTS, SNORT_SLOPE, width=.39)
    return hiss + snorts + rush(GUSTS, AIR_SLOPE, width=.45, floor=from_db(AIR_DB))


def scene():
    """Both calls over the small noises of the pasture, with a silence between them."""
    fading = from_db(-20 * np.clip((TIME - FADE_FROM_S) / FADE_S, 0, 2) ** 2)
    heard = np.maximum(fading, during(RESUME_S, TIME[-1]))
    calls = first_call() + growl() + hum() + lip_squeak() + moo() + bellow()
    return heard * (calls + pasture())


def record(dry):
    """A steep elliptic low-pass cuts the top."""
    return signal.sosfilt(signal.ellip(10, .1, 90, CUTOFF_HZ, fs=SR, output="sos"), dry)


dry = scene()
out = record(dry)
materialize(out)
```